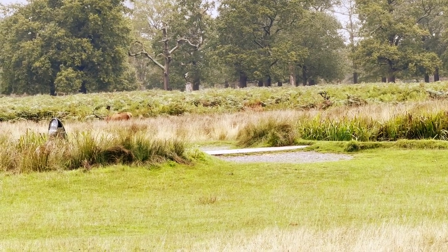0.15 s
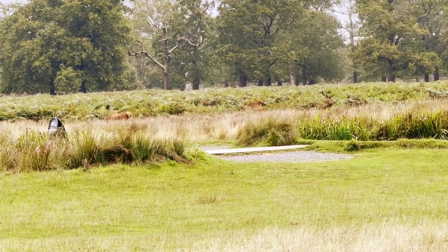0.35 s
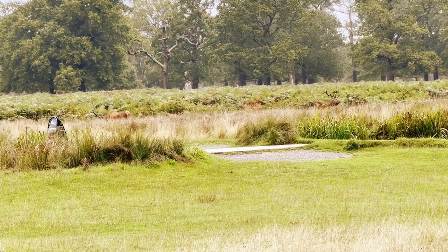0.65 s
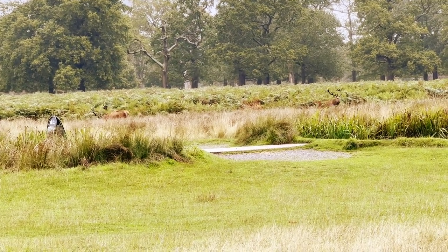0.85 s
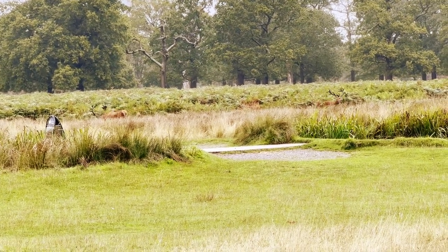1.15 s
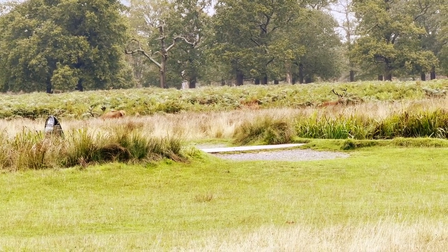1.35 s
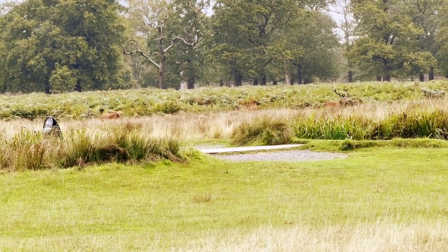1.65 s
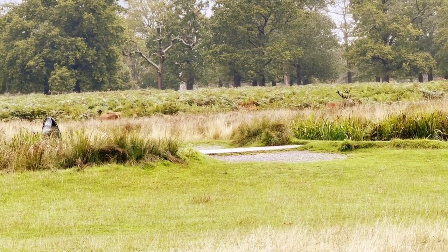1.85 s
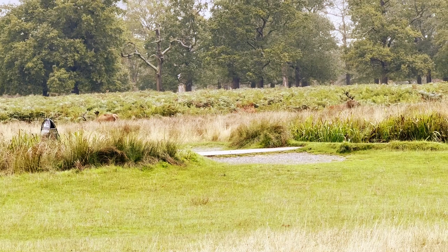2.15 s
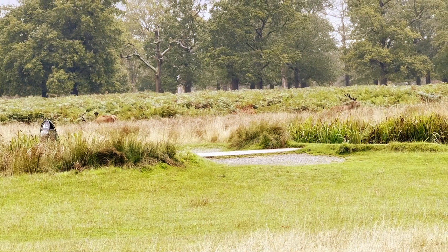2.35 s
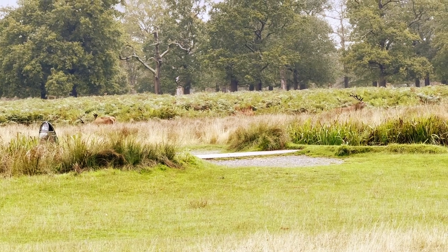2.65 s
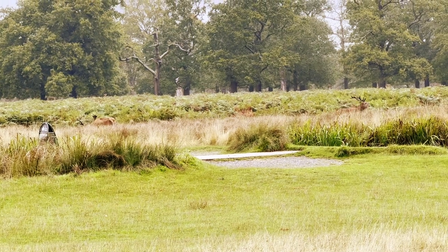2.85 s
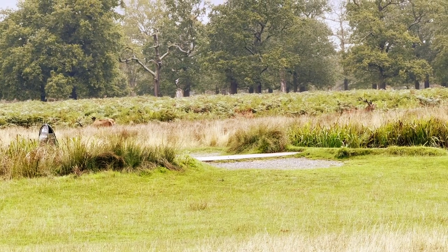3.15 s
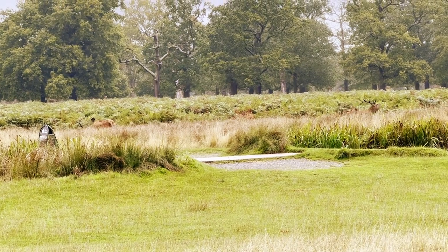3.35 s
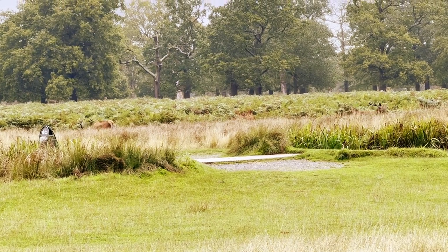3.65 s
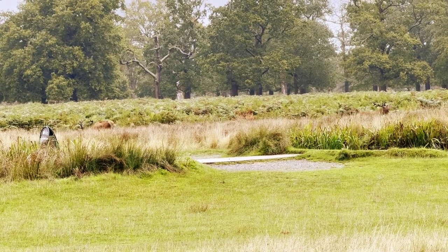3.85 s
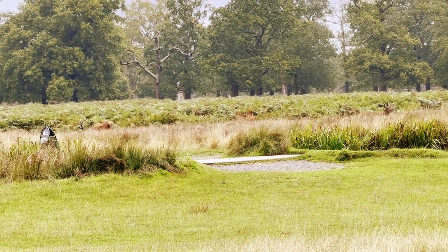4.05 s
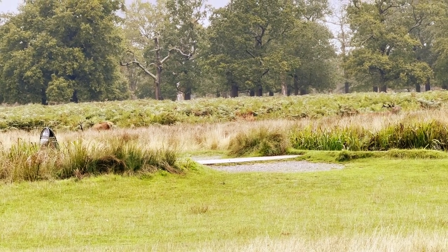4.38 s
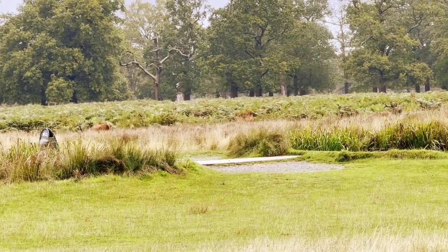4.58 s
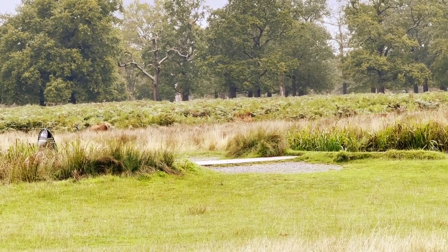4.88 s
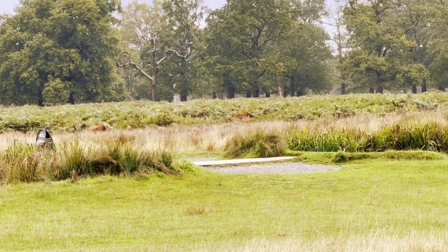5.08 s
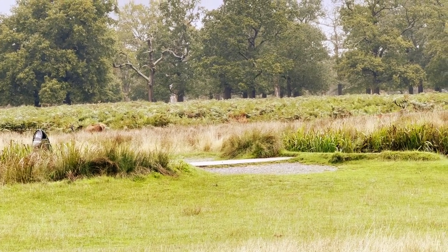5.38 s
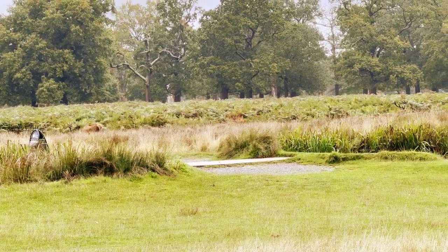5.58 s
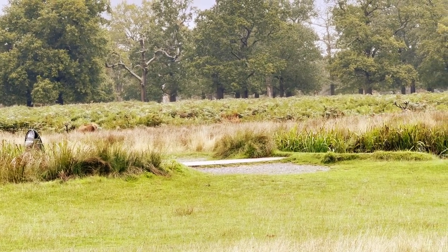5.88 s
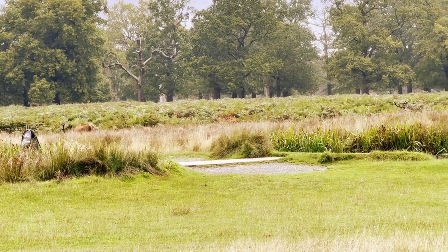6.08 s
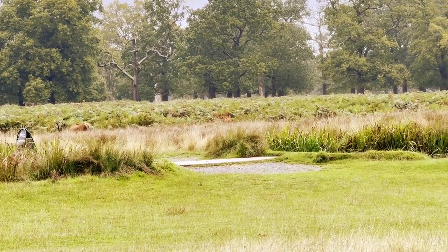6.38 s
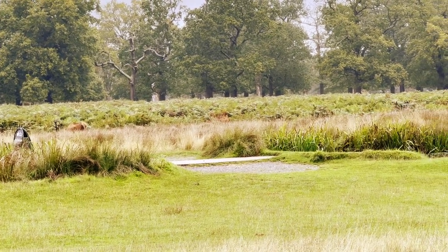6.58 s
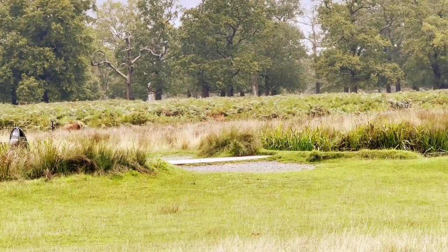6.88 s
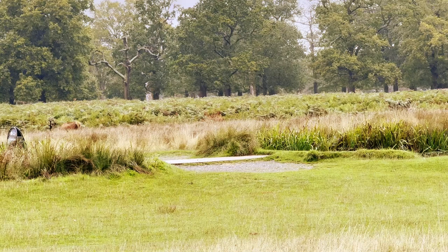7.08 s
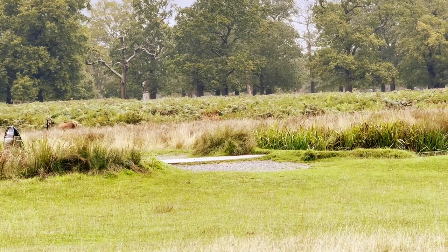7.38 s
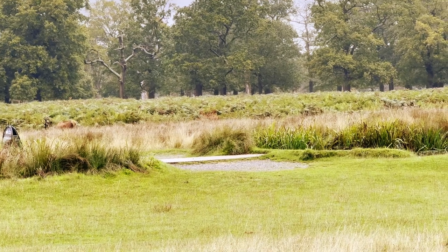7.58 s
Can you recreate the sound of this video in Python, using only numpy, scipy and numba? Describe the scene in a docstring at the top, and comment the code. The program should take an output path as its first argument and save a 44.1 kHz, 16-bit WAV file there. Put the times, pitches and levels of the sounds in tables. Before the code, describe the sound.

A quiet grassy park, heard in stereo from some way off. Deep flapping gusts come first, over soft rumble, thin bird whistles and ticks. After a calm pause a stag's rattling groan climbs into a long, resonant bellow, alternating clear and hoarse, then sinks away. Three short, breathy grunts follow at intervals. Wind puffs and a low falling thump press on the microphone before a new roar swells and is cut off at the end.

```python
"""A red deer stag roars and grunts far off across open parkland, heard through a two-port microphone.
The voice is fold pulses and turbulent air driving gliding resonances of a long throat.
Gusts are low noise in short buffets; birds are gliding whistles, noise ticks and rustles with echoes.
Shaped noise makes the rumble and far murmur under everything, and a wavering sine a far engine note."""
import sys
import numpy as np
from scipy import signal
from scipy.fft import rfft, irfft
from scipy.io import wavfile
from scipy.ndimage import uniform_filter1d
from numba import njit

SR = 44100
rng = np.random.default_rng(int(sys.argv[2]) if len(sys.argv) > 2 else 0)


def master(y):
    """Save y as 16-bit WAV."""
    cut = np.clip(np.atleast_2d(y).T, -1, 1)
    pcm = np.round(cut * 32767)  # scale
    wavfile.write(sys.argv[1], SR, pcm.astype(np.int16))


N = 340893
PAD = 4096  # spare samples around spectral filtering
T = np.arange(N) / SR
FREQ = np.maximum(np.fft.rfftfreq(N + PAD, 1 / SR), 1)

# steady chest resonances of every roar: (frequency [Hz], width [Hz], relative level [dB])
ROAR_CHEST = [(184.4, 59, 6.5), (385, 96, 2), (491, 73.6, -5.5)]
# mid-throat resonances of the roar's start and of the last roar, before the larynx moves them:
# (frequency [Hz], width [Hz], relative level [dB])
ROAR_THROAT = [(866, 100, 3.5), (1163, 120, 3), (1444, 44, 0), (1660, 100, -0.5), (1980, 88, -1),
               (2280, 220, -12)]


def stag():
    """One animal's calls in turn: a roar with its start, three grunts, and the start of another roar."""
    return roar_start() + long_roar() + grunts() + last_roar()


def roar_start():
    """The folds speed up while the larynx is pulled down, lowering the throat's resonances."""
    # voice: (time [s], fold rate [Hz], mid-throat level [dB], low-throat level [dB], roughness [0-1])
    start_voice = [(3.35, 95.55, -71.5, -57, .25), (3.422, 108.3, -59.5, -45, .1),
                   (3.548, 120.6, -59, -49, .13), (3.612, 130.5, -53.5, -44.5, 0.12),
                   (3.646, 138.2, -55.5, -39.5, .11), (3.67, 142.6, -58, -45, 0.34)]
    # top of the throat: (start [Hz], end [Hz], width [Hz], start level [dB], end level [dB])
    start_edge = [(2750, 2570, 160, 3, 2), (3350, 3340, 210, -17, -2), (3990, 3900, 300, -18, -9.5),
                  (4600, 4450, 250, -14, -8.5), (5000, 5150, 400, -40, -16)]
    larynx = (1.114, 0.95)  # factor on the resonances at the start, at the end
    edge_db = (-3, -11, -15.5)  # top against mid throat, in even steps through the call
    throat = pulled(ROAR_THROAT, larynx)
    return call([start_voice], larynx, edge_db, ROAR_CHEST, throat, start_edge, breath=1.1, hiss=1.6, slack=.2)


def long_roar():
    """Separate stretches of voice, rough and clear by turns, share one slowly moving throat."""
    # one list per stretch: (time [s], fold rate [Hz], mid-throat level [dB], low-throat level [dB],
    # roughness [0-1])
    stretches = [
        [(3.675, 172.6, -59, -41, 0.34), (3.741, 172.4, -53, -42, 0.62), (3.775, 164.9, -56.5, -40.5, 0.43),
         (3.837, 165.6, -49.5, -37, .45), (3.867, 169.7, -52, -40, .42), (3.981, 190.1, -50.5, -29.5, 0.31),
         (4.03, 192.5, -48.5, -30, 0.07), (4.201, 199, -48.5, -31.5, 0.06), (4.237, 202, -50, -29.5, 0.25),
         (4.275, 200.9, -54, -42.5, 0.91), (4.33, 195.9, -50, -33, .25), (4.407, 192.1, -46.5, -29.5, .06),
         (4.511, 196, -46.5, -31.5, 0.05), (4.56, 206.3, -53.5, -35.5, 0.47)],
        [(4.565, 233.3, -50.5, -42.5, .6), (4.629, 232, -51.5, -40, 0.47), (4.79, 240.6, -56, -37, .65)],
        [(4.795, 200.9, -57.5, -39.5, 0.48), (4.841, 185.9, -46, -34, 0.07), (4.951, 177.7, -49.5, -35.5, 0.04),
         (5.017, 157, -51.5, -40, 0.24), (5.049, 150.3, -48, -44, 0.32), (5.101, 100.2, -63, -42, 0.74),
         (5.13, 97.2, -61, -59, 0)],
    ]
    # middle and top of the throat: (start [Hz], end [Hz], width [Hz], start level [dB], end level [dB])
    roar_mid = [(860, 823, 102, 3, -0.5), (1217, 1162, 133, 3.5, 3.5), (1460, 1400, 70, -4, 2.5),
                (1662, 1590, 116, 0.5, 0), (1965, 1960, 116, 2.5, -1.7), (2283, 2254, 110, -5, -13.5),
                (2620, 2590, 99, -12, -8)]
    roar_edge = [(3040, 2980, 128, -1.5, 0.5), (3440, 3360, 180, -3, -3), (3666, 3620, 80, -5.5, -5),
                 (3900, 3810, 140, -3, 3.5), (4340, 4200, 240, -8.5, -25.5), (4720, 4750, 400, -15.5, -33),
                 (5130, 5250, 200, -10.5, -32), (5500, 5700, 190, -15.5, -19),
                 (5950, 5950, 210, -22.5, -18), (6250, 6380, 180, -17, -22), (7040, 4700, 700, -28.5, -35)]
    larynx = (1.018, 0.99)  # factor on the chest resonances at the start, at the end
    edge_db = (-10.5, -15, -12, -10, -8, -5.5)  # top against mid throat, in even steps
    return call(stretches, larynx, edge_db, ROAR_CHEST, roar_mid, roar_edge, breath=1.3, hiss=1.5, slack=.08)


def last_roar():
    """The fold rate climbs again as the larynx comes down from a high place."""
    # voice: (time [s], fold rate [Hz], mid-throat level [dB], low-throat level [dB], roughness [0-1])
    last_voice = [(7.37, 98.5, -58.5, -55, .28), (7.484, 131.5, -47, -41.5, 0.088),
                  (7.53, 138.2, -47.5, -47, 0.055), (7.594, 140.3, -45, -39, 0.075),
                  (7.63, 145.2, -53, -38, 0.078), (7.666, 149.7, -50, -46, 0.12),
                  (7.696, 153.4, -54, -37.5, 0.048), (7.74, 153.9, -47.5, -50, 0.063)]
    # top of the throat: (start [Hz], end [Hz], width [Hz], start level [dB], end level [dB])
    last_edge = [(2840, 2500, 170, 2.5, -1.5), (3220, 3060, 200, -13, -10.5), (3500, 3800, 220, -9.5, -13),
                 (3730, 3800, 170, -18.5, -15), (3950, 4330, 110, -12.5, -9), (4650, 4300, 140, -25, -22),
                 (5500, 5300, 350, -32, -26), (6800, 5200, 900, -41.5, -40)]
    larynx = (1.227, 1.032)  # factor on the resonances at the start, at the end
    edge_db = (-9.5, -9.5, -6)  # top against mid throat, in even steps
    throat = pulled(ROAR_THROAT, larynx)
    return call([last_voice], larynx, edge_db, ROAR_CHEST, throat, last_edge, breath=1.3, hiss=1.1, slack=.12)


def grunts():
    """Three short calls, each with its own shape of throat."""
    # (time [s], length [s], attack [s], release [s], top fold rate [Hz], mid-throat level [dB],
    #  low-throat level [dB], top against mid throat [dB], steadiest roughness [0-1],
    #  larynx factor at the start [ratio], larynx factor at the end [ratio])
    grunt_rows = [(5.739, 0.38, 0.15, 0.11, 95.1, -55, -55.5, -16.5, .13, 1.073, 0.91),
                  (6.424, 0.3, 0.056, 0.058, 105.7, -50.5, -51, -18.5, .13, 1.082, 0.94),
                  (7.052, .43, 0.052, 0.24, 117.1, -48.5, -45.5, -20.5, 0.1, 1.02, .9)]
    # middle and top of the throat, one list per grunt:
    # (start [Hz], end [Hz], width [Hz], start level [dB], end level [dB])
    grunt_throats = [
        [(756, 750, 160, -7, -10), (1150, 1130, 260, -5, -3), (1600, 1600, 380, 0, -1),
         (1900, 1900, 330, -4, -5), (2330, 2360, 330, -3, -7.5), (2830, 3500, 200, -25, -11)],
        [(767, 690, 130, -6, -7), (1200, 1080, 260, -2.5, -1), (1520, 1600, 330, -3, 2),
         (1980, 2200, 330, -1, -6), (2430, 2250, 300, -3.5, -4), (2700, 2780, 260, -10, -9)],
        [(704, 690, 150, -6, -3.5), (1110, 1040, 240, -3.5, -1), (1470, 1470, 260, .4, 5),
         (1830, 1900, 300, -2, -6), (2330, 2150, 280, -.4, -12), (2800, 2500, 250, -10, -15)],
    ]
    grunt_edges = [
        [(3250, 3200, 400, 0, -2), (3750, 3700, 450, -2, -1), (4300, 4400, 500, -8, -6),
         (5400, 5400, 700, -28, -26)],
        [(3250, 3300, 400, 0, -3), (3800, 3900, 450, -2, -2), (4500, 4600, 550, -7, -6),
         (5650, 5300, 600, -8, -10), (6700, 6200, 800, -13, -30)],
        [(3330, 2800, 280, 2, -4), (3800, 3700, 450, -3, -2), (4200, 5250, 500, -9, -2),
         (5600, 5700, 450, -12, -14), (6550, 5900, 650, -9, -32)],
    ]
    out = np.zeros(N)
    for throat, edge, row in zip(grunt_throats, grunt_edges, grunt_rows):
        out += grunt(throat, edge, *row)
    return out


def grunt(throat, edge, s, length, attack, release, hz, throat_db, chest_db, edge_db, rough, *larynx):
    """The pitch arches, the folds beat less evenly towards both ends, and a breathy tail follows."""
    # chest: (frequency [Hz], width [Hz], relative level [dB])
    grunt_chest = [(221, 80, 10.5), (395, 130, -2), (513.4, 28, -5)]
    top, rise, fall = .52, .15, .24  # place of the top pitch in the length; share of pitch lost before, after
    steady, end_rough = .35, .6  # place of the steadiest beat in the length; roughness at the end
    start_db, end_db = -21, -14  # fade at the very start and at the end of the length
    tail_s, tail_db = .14, -14  # the last air runs out

    u = np.linspace(0, 1 + tail_s / length, num=32)
    before_top = u < top
    from_top = np.where(before_top, 1 - u / top, (u - top) / (1 - top))
    pitch = hz * (1 - np.where(before_top, rise, fall) * np.minimum(from_top, 1.2) ** 1.5)
    corners_s = [0, attack, length - release, length, length + tail_s]
    fade = np.interp(u * length, corners_s, [start_db, 0, 0, end_db, end_db + tail_db])
    unsteady = np.interp(u, [0, steady, 1], [.7, 0, 1]) ** 2
    roughness = rough + (end_rough - rough) * unsteady
    rows = np.transpose([s + u * length, pitch, throat_db + fade, chest_db + fade, roughness])
    return call([rows], larynx, [edge_db], grunt_chest, throat, edge, breath=.9, hiss=1.8, slack=.12)


def call(tables, larynx, edge_db, chest, throat, edge, breath, hiss, slack):
    """Fold pulses and turbulent air sound the low, middle and top parts of the throat."""
    edge_growth, patchy_db, flicker_db = 0.52, 1.8, 2.5  # [dB per dB]; swell of resonances; at full roughness
    rows = np.vstack(tables)
    span = slice(int(rows[0, 0] * SR) - 900, int(rows[-1, 0] * SR) + 900)
    hz, throat_db, chest_db, rough = (c[span] for c in curve(rows))
    rough = np.clip(rough, 0, 1)
    edge_s = np.linspace(rows[0, 0], rows[-1, 0], len(edge_db))
    # the top of the throat grows with effort
    top_db = throat_db + np.interp(T[span], edge_s, edge_db) + edge_growth * (throat_db + 54.5)

    chance = rng.standard_normal((len(hz) // 100, 2))
    pulses, phase = folds(hz, rough ** 1.5, chance, .2, .6)
    air = unit(rng.standard_normal(len(hz)) * np.exp(-phase / .5))  # a puff in each open phase
    buzzing = unit(pulses, .013) + .5 * rough * air
    breathy = unit(pulses, .05) + breath * (rough + .06) * air
    bright = filtered(rng.standard_normal(len(hz)), 1, 3500, "high")
    hissy = breathy + hiss * bright * (.25 + rough)  # steady turbulence in the mouth

    parts = ((buzzing, pulled(chest, larynx), 0, 0., chest_db),
             (breathy, throat, patchy_db, slack, throat_db),
             (hissy, edge, patchy_db, slack, top_db))
    out = np.zeros(N)
    for source, modes, swell_db, loose, db in parts:
        level = undb(db + flicker_db * np.sqrt(rough) * walk(22, len(hz)))
        out[span] += unit(tract(source, modes, swell_db, loose), 0.14) * level
    sounding = np.zeros(N, dtype=bool)
    for table in tables:
        sounding |= (T > table[0][0] - .004) & (T < table[-1][0] + .004)
    return out * uniform_filter1d(sounding * 1., size=600)


@njit
def folds(hz, rough, chance, jitter, shimmer):
    """A pulse at each closing of the folds; rough cycles scatter in length and strength."""
    pulses, phase, p, k = np.zeros(len(hz) + 1), np.empty(len(hz)), 0., 0
    for i in range(len(hz)):
        step = hz[i] * np.exp(jitter * rough[i] * chance[k, 0]) / SR
        p += step
        if p >= 1:
            p, k = p - 1, k + 1
            size = np.exp(shimmer * rough[i] * chance[k, 1])
            # the pulse is shared between two samples to land between them
            pulses[i] += size * p / step
            pulses[i + 1] += size * (1 - p / step)
        phase[i] = p
    return pulses[:-1], phase


def pulled(modes, factor):
    """A moving larynx makes steady resonances glide by a factor (at the start, at the end)."""
    return [(f * factor[0], f * factor[1], width, db, db) for f, width, db in modes]


def tract(x, modes, patchy_db, slack):
    """Resonances of alternating sign glide from start to end; each drifts and swells on its own."""
    u = np.linspace(0, 1, len(x))
    hz, damp, gain = [], [], []
    for m, (from_hz, to_hz, width, from_db, to_db) in enumerate(modes):
        hz.append((from_hz + (to_hz - from_hz) * u) * (1 + .011 * walk(12, len(x))))
        damp.append(2 * width / (from_hz + to_hz))
        db = from_db + (to_db - from_db) * u + patchy_db * walk(20, len(x))
        gain.append((-1) ** m * undb(db))
    return ring(x, np.array(hz), np.array(damp), np.array(gain), slack)


@njit
def ring(x, hz, damp, gain, slack):
    """Side-by-side moving resonances, each applied twice so valleys stay dark; slack walls fill them a little."""
    out = np.zeros(len(x))
    for m in range(len(hz)):
        k, b1, l1, b2, l2 = damp[m], 0., 0., 0., 0.
        for i in range(len(x)):
            g = np.tan(np.pi * hz[m, i] / SR)
            # first pass
            v = (b1 + g * (x[i] - l1)) / (1 + g * (g + k))
            b1, l1 = 2 * v - b1, l1 + 2 * g * v
            # second pass
            w = (b2 + g * (k * v - l2)) / (1 + g * (g + k))
            b2, l2 = 2 * w - b2, l2 + 2 * g * w
            out[i] += gain[m, i] * k * (w + slack * (v - w))
    return out


def echoes(x, t60_s, db):
    """Scattered returns from trunks and bracken: a decaying noise tail with a soft onset."""
    t = T[:SR]
    tail = rng.standard_normal(len(t)) * np.exp(-np.log(1000) * t / t60_s) * np.minimum(t / 0.012, 1)
    return undb(db) * signal.fftconvolve(x, tail / np.sqrt(np.sum(tail ** 2)))[:N]


def gusts():
    """Big and small eddies shake the capsule in buffets, and one slap falls in pitch."""
    # (time [s], hold [s], big-eddy level [dB], fall [dB/s], small eddies against big [dB])
    buffet_rows = [(0.008, .21, -38, 147, -40), (0.315, 0.026, -38.5, 245, -35),
                   (0.763, 0.013, -33, 507, -27), (0.851, 0.042, -11.5, 450.5, -16),
                   (0.959, 0.032, -11, 125, -11.5), (1.026, 0.011, -21, 295.5, 3),
                   (1.045, 0.033, -12, 50, -18), (1.209, 0.022, -15, 330, -16.5),
                   (1.35, 0.014, -17.5, 504, -15), (1.432, 0.0061, -33, 295, -1.5),
                   (6.821, 0.051, -33.5, 300, -36.5), (6.875, 0.0088, -16.5, 597, -49.5),
                   (6.986, 0.037, -29, 196, -22), (7.131, .01, -26.5, 110, -33.5),
                   (7.22, 0.025, -27.5, 400, -17), (7.279, 0.0096, -16, 397.5, -6),
                   (7.308, 0.016, -17.5, 300.5, -16.5), (7.417, 0.056, -23.5, 395, -37.5),
                   (7.546, .03, -25.5, 198, -28), (7.579, .01, -18, 48, -18.5), (7.693, .01, -13, 603, -16)]
    # (frequency [Hz], relative density [dB per Hz])
    gust_colour = [(13, -68.5), (22, 4.5), (59, 3), (81, -4), (135, -16.5), (177, -21), (210, -29),
                   (253, -36.5), (420, -49.5), (550, -62.5), (920, -120)]
    rise_db_s = 519
    t = T[::64]  # coarse time for the envelopes
    big_gain, small_gain = 0, 0
    for s, hold, db, fall, small_db in buffet_rows:
        gain = undb(db - rise_db_s * np.maximum(s - t, 0) - fall * np.maximum(t - s - hold, 0))
        big_gain = np.maximum(big_gain, gain)
        small_gain = np.maximum(small_gain, undb(small_db) * gain)
    eddies = noise(gust_colour)
    big = signal.sosfiltfilt(signal.butter(2, 120, fs=SR, output="sos"), eddies)
    small = eddies - big
    buffeting = unit(big, 0.016) * np.interp(T, t, big_gain) + unit(small, 0.0086) * np.interp(T, t, small_gain)
    # 0.6 rad: the right port feels the pressure first
    both = pair(buffeting + thump(), 0.18, .6)
    # the microphone's wind filter cuts the deepest bass; the cover smothers the top
    return filtered(both, 4, [58, 320], "band")


def thump():
    """The slap of a gust: a sine sinks quickly in pitch and dies away."""
    # (time [s], peak level ahead of the wind filter [dB], from [Hz], to [Hz], glide [s], 60 dB decay [s])
    slap_row = (7.262, -13, 230, 72, .014, .11)
    start, peak_db, from_hz, to_hz, glide_s, t60_s = slap_row
    t = np.maximum(T - start, 0)
    turns = to_hz * t + (from_hz - to_hz) * glide_s * (1 - np.exp(-t / glide_s))
    envelope = (1 - np.exp(-t / .012)) ** 2 * np.exp(-np.log(1000) * t / t60_s)
    slap = np.sin(2 * np.pi * turns) * envelope
    return undb(peak_db) * slap / slap.max()


def birds():
    """Notes broken up by leaves, ticks and rustles ring among the trees; far chatter is heard only as echo."""
    t60_s = .6
    near = bird_notes() * undb(3 * walk(220))
    near += echoes(filtered(near, 4, 1500, "high"), .1, -4)  # close scatter from leaves
    near += ticks() + rustles()
    near_echo = echoes(filtered(near, 4, 1500, "high"), t60_s, -4)
    return near + near_echo + echoes(far_chatter(), t60_s, 0)


def bird_notes():
    """Three birds each repeat one falling glide at changing pitch, among short lone whistles."""
    # calls of each bird: (time [s], start [Hz], level [dB])
    singer_calls = [(.375, 4300, -72), (.695, 4230, -69), (1.012, 4280, -67)]
    chirper_calls = [(2.0, 4700, -80), (2.935, 4400, -81), (2.981, 4700, -83), (3.195, 4500, -78),
                     (5.37, 4750, -82), (5.41, 4400, -83), (5.665, 4550, -78), (6.195, 4200, -79),
                     (6.925, 5600, -83), (6.96, 4200, -79)]
    warbler_calls = [(.193, 2500, -80), (.37, 2200, -82), (.63, 2450, -87), (.95, 1780, -78.5),
                     (.998, 2300, -82), (1.155, 2700, -76), (1.369, 3150, -86), (1.509, 2190, -95),
                     (1.7, 2450, -90), (2.127, 2480, -82), (2.42, 2500, -85)]
    # lone whistles: (time [s], from [Hz], to [Hz], level [dB])
    pip_rows = [(.065, 4520, 4120, -84), (.095, 4120, 4000, -72), (.48, 2390, 2490, -79.5),
                (.91, 1380, 1794, -76), (5.55, 4740, 4820, -85.5), (6.13, 7240, 7200, -86),
                (3.61, 7000, 7200, -84), (6.93, 6900, 6130, -86), (6.92, 2700, 2730, -77.5),
                (.937, 3290, 3650, -79), (1.16, 6930, 6980, -78.5), (1.47, 1080, 1060, -67),
                (1.488, 2325, 2234, -76), (1.972, 796, 760, -58.5), (2.797, 674, 978, -59.5),
                (2.857, 2490, 2076, -74), (3.23, 2540, 2310, -75), (6.338, 4140, 3720, -74)]
    # note length [s], end over start pitch [ratio], bend of the glide
    singers = ((.075, .86, 2.0, singer_calls), (.085, .68, 1.2, chirper_calls), (.11, .84, 1.7, warbler_calls))
    out = np.zeros(N + SR)
    for s, from_hz, to_hz, db in pip_rows:
        place(out, s, undb(db) * whistle(0.054, from_hz, to_hz, 2.0))
    for length, fall, bend, calls in singers:
        for s, hz, db in calls:
            place(out, s, undb(db) * whistle(length, hz, hz * fall, bend))
    return out[:N]


def whistle(length_s, from_hz, to_hz, bend):
    """One gliding sine note that swells and fades."""
    u = np.linspace(0, 1, int(length_s * SR))
    hz = to_hz + (from_hz - to_hz) * (1 - u) ** bend
    return np.sin(np.pi * u) * np.sin(2 * np.pi * np.cumsum(hz) / SR)


def ticks():
    """Sharp calls of a small bird: one decaying burst of high noise, repeated."""
    # (time [s], level [dB])
    tick_rows = [(1.1425, -68.5), (1.4162, -70), (3.606, -65.5), (3.782, -66.5), (5.9767, -60),
                 (6.1243, -69), (6.505, -65.5), (7.428, -63)]
    t = T[:int(.03 * SR)]
    burst = filtered(rng.standard_normal(len(t)), 2, [5800, 7600], "band")
    burst = unit(burst) * np.exp(-t / 0.0096) / 2
    out = np.zeros(N + SR)
    for s, db in tick_rows:
        place(out, s, undb(db) * burst)
    return out[:N]


def rustles():
    """Diffuse rustles among the birds, and a long faint haze of high noise from 5.1 s: bands of noise that
    swell and fade."""
    # (time [s], length [s], low edge [Hz], high edge [Hz], level at the height of the swell [dB])
    rustle_rows = [(2.59, .18, 2500, 4300, -79), (5.1, .85, 3200, 4500, -82), (2.94, .12, 3200, 4700, -83),
                   (6.15, .14, 4200, 5000, -86), (6.93, .12, 3600, 5300, -83)]
    out = np.zeros(N)
    for s, length, low_hz, high_hz, db in rustle_rows:
        band = filtered(rng.standard_normal(N), 4, [low_hz, high_hz], "band")
        out += undb(db) * unit(band) * np.sin(np.pi * np.clip((T - s) / length, 0, 1))
    return out


def far_chatter():
    """Many falling whistles at random times, pitches and levels."""
    out = np.zeros(N + SR)
    for when, pitch, fall, size in rng.random((260, 4)):
        hz = 1900 * 2.3 ** pitch ** 1.5
        note = whistle(0.072, hz, hz * (.9 - 0.2 * fall), 2.0)
        place(out, when * N / SR, undb(-84.5 + 8.5 * size) * note)
    return out[:N]


def park():
    """Low rumble, a far murmur that flickers a little, and a wavering drone; also the murmur's wide part."""
    # steady air: (time [s], low rumble level [dB], far murmur level [dB])
    air_rows = [(0, -52, -57.5), (1.55, -54.5, -59), (2.2, -61, -58.5), (2.46, -51, -59.5),
                (2.8, -59.5, -59), (3.4, -49, -59), (5.2, -52, -56.5), (6.2, -50, -60.5),
                (6.35, -55, -57.5), (6.7, -48.5, -61), (7.73, -44, -51)]
    # colours: (frequency [Hz], relative density [dB per Hz])
    rumble_colour = [(20, -25.5), (35, 0.5), (55, 8.5), (100, 7), (140, -4), (220, -20.5), (300, -54.5)]
    murmur_colour = [(80, -23.5), (140, 5), (250, -5), (400, -6.5), (700, -13.5), (1100, -20),
                     (1500, -26.5), (2400, -36.5), (3000, -45.5), (4100, -38.5), (4600, -50), (5300, -89)]
    rumble_db, murmur_db = curve(air_rows)
    rumble = unit(noise(rumble_colour), 0.093) * undb(rumble_db + 1.8 * walk(8))
    level = undb(murmur_db + 1.0 * walk(4.82))
    murmur = level * noise(murmur_colour)
    sides = filtered(noise(murmur_colour), 2, [350, 1500], "band")
    wide = 0.71 * level * sides * np.array([[1], [-1]])  # opposite on the two ports
    return rumble + drone() + murmur, wide


def drone():
    """A far engine note: one sine sags slowly while its pitch and level waver."""
    # (time [s], level [dB])
    drone_level = [(0, -77), (.3, -67.5), (1.45, -64.5), (2.4, -71.5), (2.8, -99)]
    hz = 504 - 2.7 * T + 4 * walk(20)
    level = undb(curve(drone_level)[0] + 2 * walk(36))
    return level * np.sin(2 * np.pi * np.cumsum(hz) / SR)


def undb(db):
    """Decibels to gain."""
    return 10 ** (np.asarray(db) / 20)


def unit(x, window_s=None):
    """Scale to rms 1, overall or along a running window."""
    if window_s is None:
        power = np.mean(x ** 2)
    else:
        size = int(window_s * SR)
        power = uniform_filter1d(uniform_filter1d(x ** 2, size), size)
    return x / np.sqrt(power + 1e-20)


def filtered(x, order, hz, kind):
    """Butterworth filter."""
    return signal.sosfilt(signal.butter(order, hz, kind, fs=SR, output="sos"), x)


def place(out, s, sound):
    """Add a sound at a time in seconds."""
    start = int(s * SR)
    out[start:start + len(sound)] += sound


def curve(rows):
    """Columns of a table along time."""
    s, *columns = np.transpose(rows)
    return [np.interp(T, s, c) for c in columns]


def along_hz(table):
    """Columns of a table along log frequency."""
    hz, *columns = np.transpose(table)
    return [np.interp(np.log(FREQ), np.log(hz), c) for c in columns]


def noise(colour):
    """Noise with a given spectrum, rms 1."""
    spectrum = rfft(rng.standard_normal(N + PAD)) * undb(along_hz(colour)[0])
    return unit(irfft(spectrum, N + PAD)[:N])


def walk(rate, size=N):
    """Random levels held 1 / rate seconds, then smoothed twice."""
    k = int(SR / rate)
    steps = np.repeat(rng.standard_normal(size // k + 1), k)
    return 1.52 * uniform_filter1d(uniform_filter1d(steps, k), k)[:size]


def pair(x, lean_db, lead):
    """One sound on the two ports: left louder by lean_db, right ahead by lead radians."""
    mirrored_end = (2 * x[-1] - x[::-1][1:PAD + 1]) * np.linspace(1, 0, PAD)  # avoids a jump at the end
    spectrum = rfft(np.append(x, mirrored_end))
    half = undb(lean_db / 2) * np.exp(-.5j * lead)
    return np.array([irfft(spectrum * half, N + PAD)[:N], irfft(spectrum / half, N + PAD)[:N]])


def scene():
    """Airborne sound takes the colour of the two ports; wind acts on them directly."""
    # (frequency [Hz], left minus right [dB], phase by which the right leads [rad])
    ports = [(62.4, 0.5, -0.38), (122, 2.5, -0.23), (250, 0.6, .04), (440, 0.5, -0.089), (694, 5, -1.1),
             (1260, 0.5, 0.88), (1930, -0.5, -0.32), (3130, 0, -0.56), (5500, 0, -0.26)]
    trees_t60_s = .9
    voice = stag()
    middle, wide = park()
    air = voice + echoes(voice, trees_t60_s, -15) + birds() + middle
    scattered = echoes(voice, trees_t60_s, -29.5) * np.array([[1], [-1]])  # returns from the sides
    return pair(air, *along_hz(ports)) + wide + scattered + gusts()


def record(dry):
    """The microphone path ends in the mid treble; faint circuit hiss follows it."""
    mic_top_hz, top_hz = 7620, 15700
    capsule = undb(-88.5) * rng.standard_normal(N)  # steady self-noise
    narrow = signal.sosfilt(signal.ellip(10, .2, 60, mic_top_hz, fs=SR, output="sos"), dry + capsule)
    hiss = undb(-100) * filtered(rng.standard_normal(dry.shape), 2, 11000, "high")
    return signal.sosfilt(signal.ellip(8, .2, 70, top_hz, fs=SR, output="sos"), narrow + hiss)


dry = scene()
out = record(dry)
master(out)
```